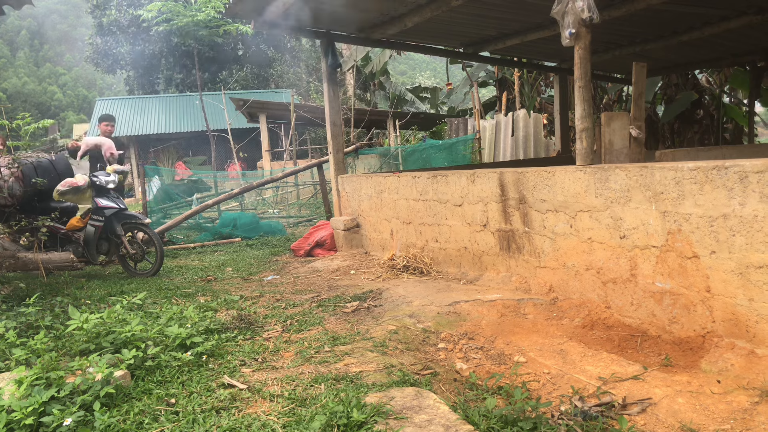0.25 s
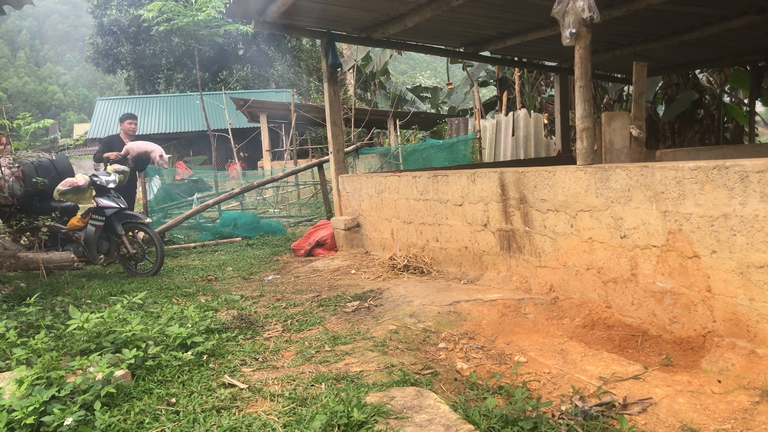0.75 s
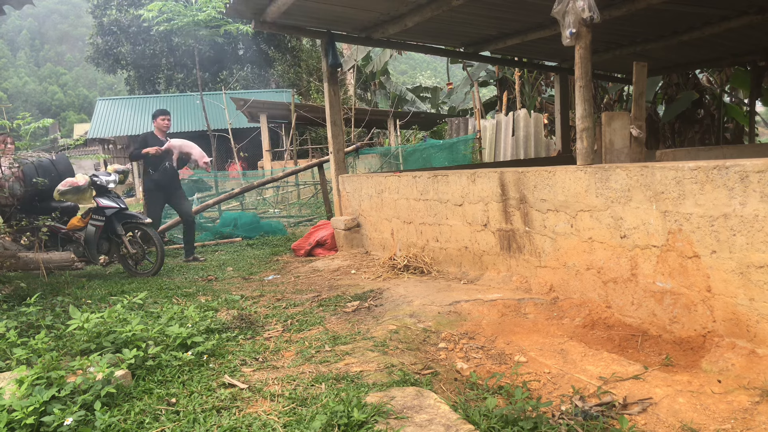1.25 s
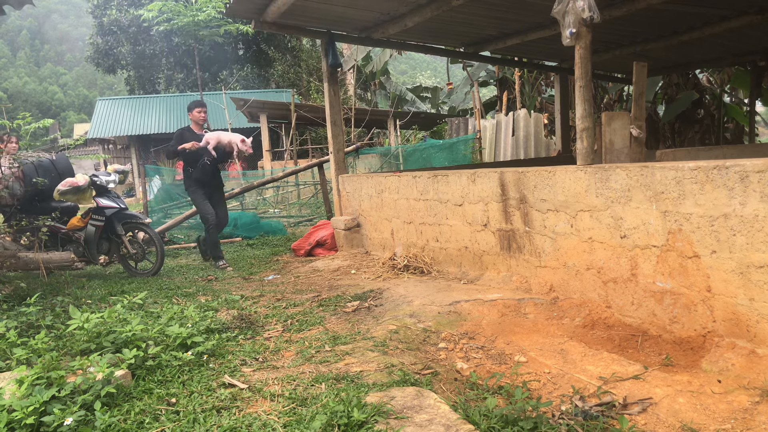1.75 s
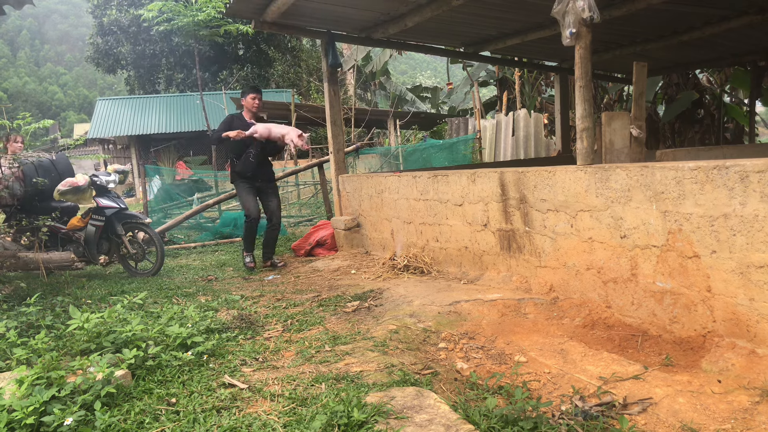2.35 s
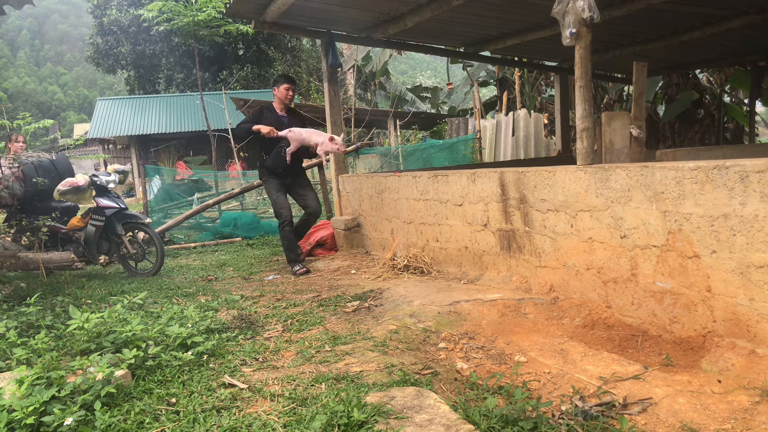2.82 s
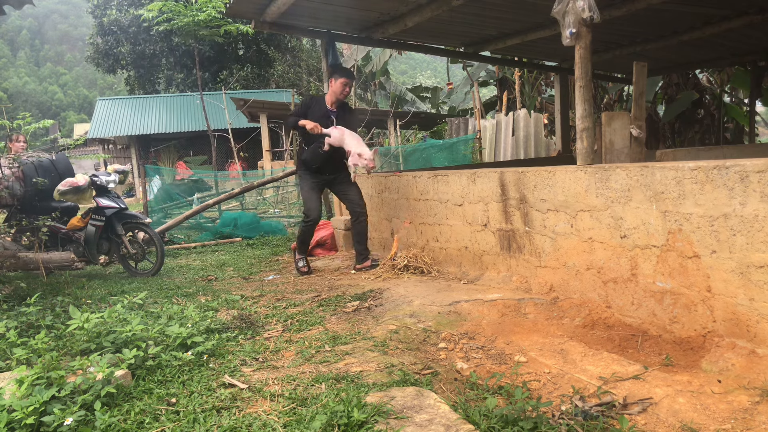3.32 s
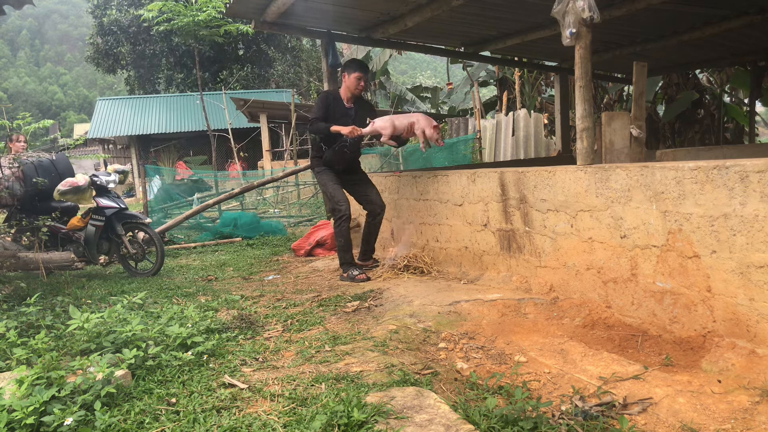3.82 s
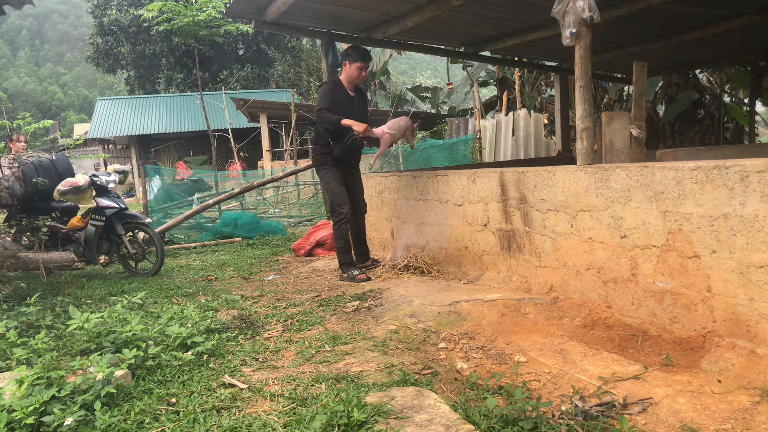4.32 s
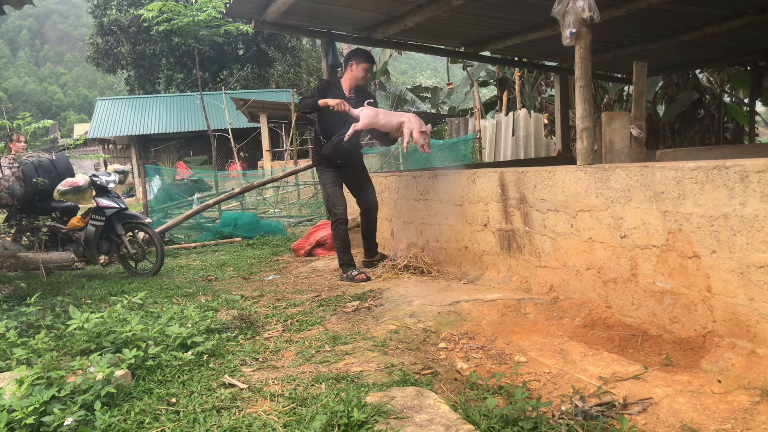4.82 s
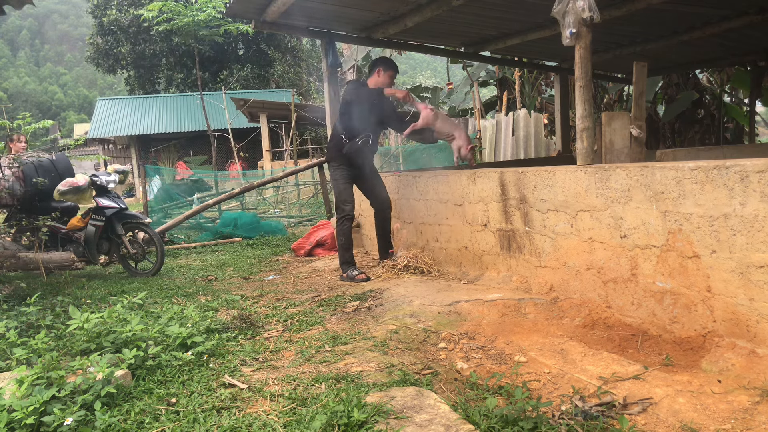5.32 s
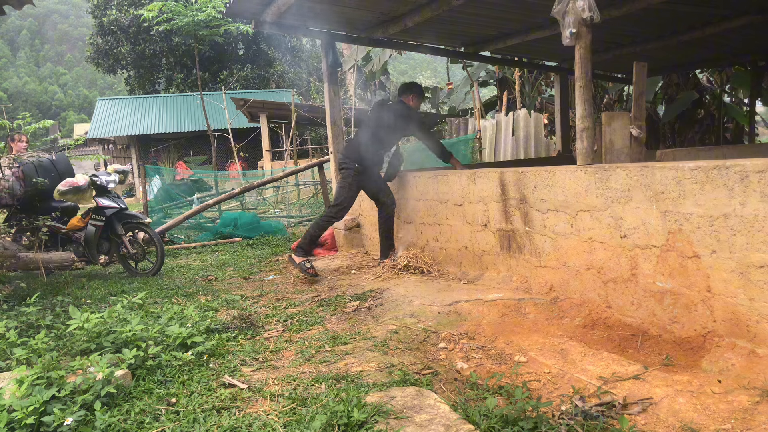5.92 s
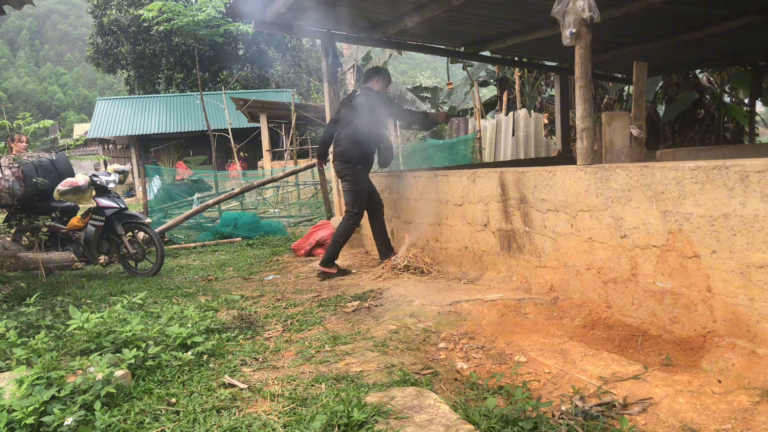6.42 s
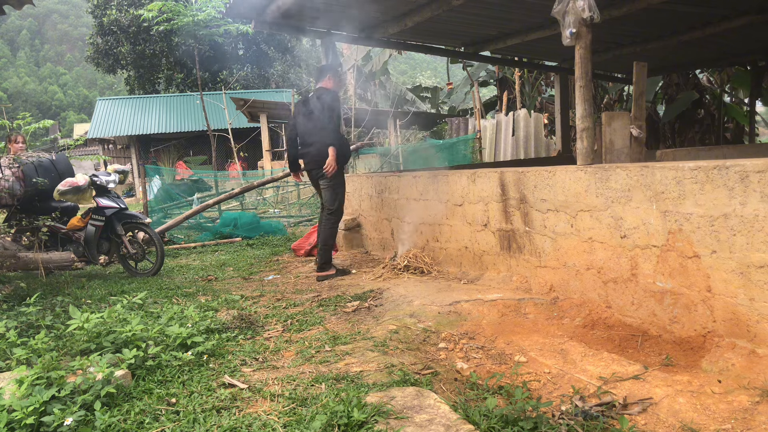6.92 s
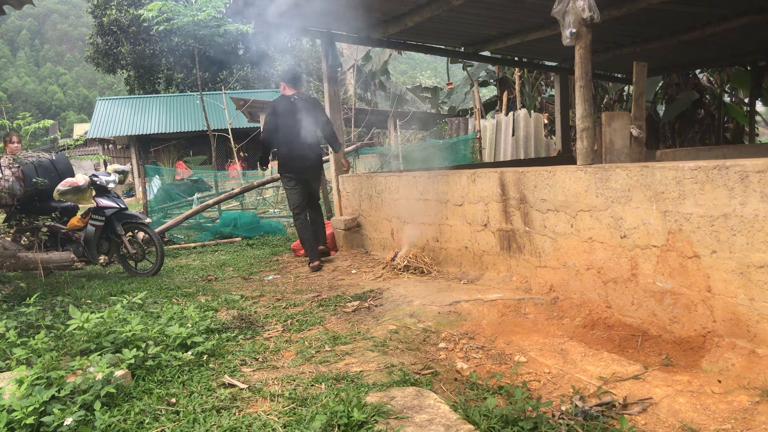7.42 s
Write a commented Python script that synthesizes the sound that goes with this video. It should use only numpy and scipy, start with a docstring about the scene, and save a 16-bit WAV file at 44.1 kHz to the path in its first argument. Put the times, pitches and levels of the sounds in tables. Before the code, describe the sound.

A piglet's very loud, shrill screaming dominates a quiet outdoor yard with faint air, a distant engine hum and occasional tiny fire snaps. It builds from low whine to short shrieks, then long whistling, rasping screams with brief gaps, some croaky yelps and one final scream. Afterwards come low grunts, gritty footsteps and cloth rubs, see-sawing bird calls and faint peeps. Centred sound from a single stationary microphone, lightly echoing.

```python
"""A piglet is carried across a farm yard, over outdoor air, a far engine's hum and a few fire snaps.
Birds call at once; the piglet whines and grumbles, then screams again and again, with hoarse yelps
before the last scream. Most screams break out of a slow rattle into a shrill whistle over rasping folds.
Then it only grunts while feet and clothes scuff, the birds return and a low drone swells.
Voices and notes are built from oscillators; air, breath and grit are shaped noise; echoes follow."""
import sys
import numpy as np
from scipy import signal
from scipy.fft import irfft, next_fast_len
from scipy.io import wavfile
from scipy.ndimage import uniform_filter1d

SR = 44100
rng = np.random.default_rng(int(sys.argv[2]) if len(sys.argv) > 2 else 0)


def to_wav(s):
    """Save 16-bit WAV."""
    ch = np.atleast_2d(s).T  # columns
    pcm = np.round(np.clip(ch, -1, 1) * 32767)  # PCM
    wavfile.write(sys.argv[1], SR, pcm.astype(np.int16))


N = 337933
TIME = np.arange(N) / SR


def gain_of(db):
    """Decibels to gain."""
    return 10 ** (np.asarray(db) / 20)


def evened(x):
    """Scales to rms 1."""
    return x / np.sqrt(np.mean(x ** 2) + 1e-20)


def steadied(x, size=900):
    """Scales to a running rms of 1, over windows of size samples."""
    running_power = uniform_filter1d(uniform_filter1d(x ** 2, size), size)
    return x / np.sqrt(abs(running_power) + 1e-14)


def read(points, hz):
    """Reads a spectrum on a log-frequency axis."""
    f, value = np.transpose(points)
    return np.interp(np.log(hz + 1), np.log(f + 1), value)


def follow(rows, t):
    """Reads every column of a curve at the times t."""
    s, *columns = np.transpose(rows)
    return [np.interp(t, s, c) for c in columns]


def span(rows):
    """Sample times covered by a curve."""
    return np.arange(rows[0][0], rows[-1][0], 1 / SR)


def add(mix, s, sound):
    """Mixes a sound in at time s."""
    part = mix[max(round(s * SR), 0):][:len(sound)]
    part += sound[:len(part)]


def faded(x, size=260):
    """Softens both ends over size samples."""
    n = np.arange(len(x))
    return x * np.minimum(np.minimum(n, n[::-1]) / size, 1)


def drift(n, hz):
    """Smooth random wander of about rms 1, with rates up to about hz."""
    f = np.fft.rfftfreq(next_fast_len(n + SR // 4), 1 / SR)
    spectrum = rng.standard_normal(len(f)) + 1j * rng.standard_normal(len(f))
    return evened(irfft(spectrum * np.exp(-(f / hz) ** 2)))[:n]


def colour(x, points):
    """Causal (minimum-phase) filter with the given spectrum."""
    log_gain = np.log(gain_of(read(points, abs(np.fft.fftfreq(4096, 1 / SR)))))
    taps = np.fft.ifft(np.exp(np.conj(signal.hilbert(log_gain)))).real[:2048]
    return signal.oaconvolve(x, taps)[:len(x)]


def note(hz, gain, waver):
    """A nearly pure tone that follows a pitch and a gain, with a slightly wavering pitch."""
    turns = np.cumsum(hz * (1 + waver * drift(len(hz), 48))) / SR
    return faded(np.sqrt(2) * gain * np.sin(2 * np.pi * turns))


def arch(length, skew):
    """Gain that rises and falls once; a skew under 1 brings the top forward."""
    return np.sin(np.pi * np.linspace(0, 1, round(length * SR)) ** skew).clip(0)


def glide(length, from_hz, to_hz, db, waver, skew=1):
    """A note that swells and fades while it eases from one pitch to another."""
    gain = np.sqrt(arch(length, 0.99))
    ease = (1 - np.cos(np.pi * np.linspace(0, 1, len(gain)) ** skew)) / 2
    return note(from_hz + (to_hz - from_hz) * ease, gain_of(db) * gain, waver)


# colour of the outdoor air: (frequency [Hz], gain [dB])
AIR = [(15, -39), (25, -24), (52, -5), (137, -7), (170, -12.5), (223, -11.5), (344, -13.5), (416, -17),
       (1070, -20), (1840, -28.5), (4250, -29), (5140, -35), (8140, -35.5), (9570, -36), (16000, -41)]
AIR_DB = -67  # before the microphone's bass thinning
# orders of the far engine: (multiple of the firing rate, level before its drift [dB])
HUM = [(2, -76.5), (3, -76), (4, -66.5), (5, -66.5), (6, -78.5)]
FIRING_HZ = 30.83
DRONE_HZ, DRONE_DB = 55, -75.5  # the drone's pitch and level until it grows
DRONE_GROWS_S, DRONE_DB_PER_S, DRONE_HZ_PER_S = 5.5, 7, 1.9  # from this time it swells and rises steadily


def background(waver=.006):
    """Outdoor air as shaped noise, the far engine's orders as sines and a drone just below the lowest one."""
    air = gain_of(AIR_DB + 1.5 * drift(N, 1.3)) * evened(colour(rng.standard_normal(N), AIR))
    air = colour(air, [(20, -14.5), (40, -7.5), (70, 0), (200, 4.5)])  # the microphone thins the deepest bass
    turns = np.cumsum(FIRING_HZ * (1 + waver * drift(N, 6.8))) / SR
    hum = np.zeros(N)
    for k, db in HUM:
        level = gain_of(db + 3.7 * drift(N, 4))
        hum += np.sqrt(2) * level * np.sin(2 * np.pi * (k * turns + rng.random()))
    grown = np.maximum(TIME - DRONE_GROWS_S, 0)
    drone_hz = DRONE_HZ + DRONE_HZ_PER_S * grown
    drone = note(drone_hz, gain_of(DRONE_DB + DRONE_DB_PER_S * grown), waver=0.046)
    return air + hum + drone


# how long the yard rings: (frequency [Hz], time to fall 60 dB [s])
YARD = [(150, 0.43), (1200, 0.59), (2800, 0.49), (6000, 0.48), (15000, 0.04)]


def yard(x, early_db=5, early_s=0.033):
    """Scattered echoes from the wall, the shed and the trees; the first ones are strongest."""
    t = np.arange(SR) / SR
    # about 2500 echoes a second with random signs, none in the first 4 ms
    taps = rng.choice([-1., 1.], SR) * (rng.random(SR) < 2500 / SR) * (t > .004)
    taps = taps * (1 + gain_of(early_db) * np.exp(-t / early_s))
    hz, at, z = signal.stft(taps, SR, nperseg=256)
    decay = gain_of(-60 * at / read(YARD, hz)[:, None])
    tail = signal.istft(z * decay, SR, nperseg=256)[1]
    return signal.oaconvolve(x, tail / np.linalg.norm(tail))[:N]


# bouts of the small bird's evenly spaced calls: (start [s], level before the stroke's own [dB])
CHIRPS = [(.005, -63.5), (5.082, -63)]
# upstroke and downstroke of one call:
# (delay after its start [s], length [s], from [Hz], to [Hz], level within the bout [dB])
CHIRP = [(0, .06, 3970, 7420, -1), (0.088, .068, 6700, 3465, -3)]
CHIRP_EVERY_S = .1843
CHIRP_EASE = 0.91  # under 1, a stroke reaches its last pitch early and lingers there
# a third bird's short falling peeps: (start [s], level [dB])
PEEPS = [(6.93, -69), (7.189, -71), (7.444, -67.5)]
PEEP_S, PEEP_FROM_HZ, PEEP_TO_HZ = .042, 2200, 1402  # every peep falls alike
# a far bird's whistled notes: (start [s], length [s], from [Hz], to [Hz], level before far_db [dB])
FAR_NOTES = [(.11, 0.16, 1304, 1306, -64), (6.856, 0.18, 1285, 1380, -63.5),
             (7.046, 0.094, 1310, 1515, -59), (7.149, 0.074, 1494, 1614, -66),
             (7.257, 0.155, 1257, 1290, -65.5)]


def birds(far_db=-1, calls=4):
    """Gliding whistles: a small bird see-saws in the trees; others whistle and peep from farther off."""
    out = np.zeros(N)
    for s, db in CHIRPS:
        for k in range(calls):
            for after, length, from_hz, to_hz, stroke_db in CHIRP:
                stroke = glide(length, from_hz, to_hz, db + stroke_db, waver=0.0071, skew=CHIRP_EASE)
                add(out, s + k * CHIRP_EVERY_S + after, stroke)
    for s, db in PEEPS:
        add(out, s, glide(PEEP_S, PEEP_FROM_HZ, PEEP_TO_HZ, db, waver=0.0044))
    for s, length, from_hz, to_hz, db in FAR_NOTES:
        add(out, s, glide(length, from_hz, to_hz, db + far_db, waver=.003))
    return out


# scuffs of feet and clothes: (start [s], length [s], level before level_db [dB])
SCUFFS = [(4.949, 0.31, -59.5), (5.18, .2, -63), (5.37, 0.5, -63), (5.978, 0.21, -67.5),
          (6.18, 0.14, -65.5), (6.373, 0.084, -60), (6.611, 0.094, -54.5), (6.74, 0.2, -61.5),
          (6.94, 0.26, -59.5), (7.13, 0.4, -69), (7.55, .11, -67.5)]


def scuffs(level_db=-3, grains_per_s=1500, skew=0.55):
    """Grit and cloth rub in small grains, swelling and fading with each move."""
    sizes = gain_of(1.4 * np.minimum(rng.exponential(1, N), 4)) * rng.standard_normal(N)
    grains = sizes * (rng.random(N) < grains_per_s / SR)
    grit = colour(grains, [(200, -31), (800, 4), (1900, 8.5), (2600, 0.5), (4000, 1), (7000, -3.5), (15000, -7)])
    pressure = np.zeros(N)
    for s, length, db in SCUFFS:
        add(pressure, s, gain_of(db + level_db) * arch(length, skew) ** 2)
    return pressure * evened(grit)


# fire snaps: (start [s], peak level [dB], brightness: gain at 10 kHz [dB])
SNAPS = [(0.067, -23.5, -14.5), (0.172, -34, 0), (3.388, -27.5, 7), (4.149, -32.5, -6), (5.118, -45, -10),
         (5.128, -43, -17), (5.215, -39.5, -12.5), (5.404, -30.5, -7), (6.078, -47, -1), (6.524, -36.5, -3),
         (7.085, -44.5, -19.5)]


def fire(decay_s=0.0015, second_db=-24, second_decay_s=0.0014):
    """Burning twigs burst with a very short crack."""
    out, t = np.zeros(N), np.arange(1500) / SR
    for s, db, bright_db in SNAPS:
        envelope = np.exp(-t / decay_s) + gain_of(second_db) * np.exp(-t / second_decay_s)
        burst = rng.standard_normal(len(t)) * envelope
        crack = colour(burst, [(200, -13.0), (1300, -1.5), (3500, -1.5), (6000, -3.5),
                               (10000, bright_db), (16000, bright_db - 1.5)])
        add(out, s, gain_of(db) * crack / abs(crack).max())
    return out


def vocal_folds(fold_hz, rough):
    """Strong and weak beats alternate, putting half lines between the harmonics; each line swells and strays."""
    n = len(fold_hz)
    turns = np.cumsum(fold_hz) / SR
    lines = np.zeros(n)
    for k in range(2, 58):  # even k are harmonics, odd k the half lines
        stray_hz = min(9 * k, 85) * (.5 + rough) * drift(n, 32)
        size = np.where(k % 2, .8 * rough, 1) * gain_of(5 * drift(n, 38))
        stray_turns = np.cumsum(stray_hz) / SR + rng.random()
        lines += size * np.cos(np.pi * k * turns + 2 * np.pi * stray_turns)
    puffs = (1 + .7 * np.cos(2 * np.pi * turns)) * rng.standard_normal(n)
    return evened(lines) + (.3 + .7 * rough ** 2) * evened(puffs)


# throat resonances at full scream: (centre [Hz], width [Hz], gain before the bands are levelled [dB])
THROAT = [(560, 110, -9), (1317, 200, 10), (1530, 420, 1), (2720, 650, 13.5), (3220, 290, 18),
          (4260, 1200, 12), (5590, 1680, 11), (8210, 1100, 14.5), (10630, 2500, 1.5), (14020, 6900, 2)]
FULL_SCREAM_HZ = 2680
# overtones of the whistle: (multiple, level against the fundamental before its drift [dB])
OVERTONES = [(1, 0), (2, -21), (3, -21), (4, -31), (5, -33)]
DROOP_S = .011  # the whistle leaps up to its pitch, and droops in this time as the air runs out
# the mouth's ring follows the rasp (slope in dB per dB) and flares in the leap; the hiss on top follows too
MOUTH_DB, MOUTH_SLOPE, MOUTH_LEAP_DB = -26, 0.64, 18
HISS_DB, HISS_SLOPE = -11.5, 0.85
SCREAM_ATTACK_S, SCREAM_RELEASE_S = 0.016, .014


def scream(rows, voice, ratio, whistle_db=-1.0, quaver_db=0.66):
    """A whistle and its overtones, with the folds beating near a whole fraction of its pitch."""
    t = span(rows)
    n = len(t)
    hz, tone_level, rasp_level = follow(rows, t)
    least_rough, mouth_db, hiss_db, leap_share, leap_s, droop_share = voice
    leap, droop = np.exp((t[0] - t) / leap_s), np.exp((t - t[-1]) / DROOP_S)
    hz = uniform_filter1d(hz, size=500) * (1 - leap_share * leap - droop_share * droop)
    mouth_level = MOUTH_DB + mouth_db + MOUTH_SLOPE * rasp_level + MOUTH_LEAP_DB * leap
    hiss_level = HISS_DB + hiss_db + HISS_SLOPE * rasp_level

    # the voice is cleanest where the whistle stands far above the rest
    clear_db = tone_level - np.maximum(rasp_level, mouth_level)
    rough = np.clip(.8 - clear_db / 14, least_rough, 1)
    hz = hz * (1 + rough * (.016 * drift(n, 35) + .01 * drift(n, 350)))
    turns = np.cumsum(hz) / SR
    tone = np.zeros(n)
    for k, db in OVERTONES:
        tone += gain_of(db + 3 * (k > 1) * drift(n, 25)) * np.sin(2 * np.pi * k * turns)
    tone *= 1 + .08 * np.cos(2 * np.pi * turns / ratio) + .35 * rough * drift(n, 110)
    tone *= gain_of(quaver_db * drift(n, 22))
    drive = vocal_folds(hz / ratio * (1 + .025 * rough * drift(n, 14)), rough)

    # the throat's resonances rise with the pitch as the mouth is pulled open; the lowest move least
    f, at, z = signal.stft(drive, SR, nperseg=512, noverlap=384)
    opening = np.interp(at, t - t[0], hz) / FULL_SCREAM_HZ
    f = f[:, None]
    power = 0
    for centre, width, db in THROAT:
        moved = centre * opening ** (.35 if centre < 2000 else .75)
        power = power + gain_of(db) ** 2 / (1 + (2 * (f - moved) / width) ** 2) ** 2
    z = z * np.sqrt(power)

    def band_sound(band):
        """One band of the throat's sound, held at a steady level."""
        return steadied(signal.istft(z * band, SR, nperseg=512, noverlap=384)[1][:n])

    low, high = 1 / (1 + (f / 2100) ** 12), 1 / (1 + (7000 / (f + 1)) ** 12)
    mouth, rasp, hiss = band_sound(low), band_sound(1 - low - high), band_sound(high)
    harsh = gain_of(mouth_level) * mouth + gain_of(rasp_level) * rasp + gain_of(hiss_level) * hiss
    flutter = gain_of(2.4 * rough * drift(n, 90))
    attack = np.minimum((t - t[0]) / SCREAM_ATTACK_S, 1)
    release = np.minimum((t[-1] - t) / SCREAM_RELEASE_S, 1)
    whistle = np.sqrt(2) * gain_of(tone_level + whistle_db) * tone
    return t[0], attack * release * faded(whistle + harsh * flutter)


# colour of the chest, scaled in frequency by each growl's throat tuning: (frequency [Hz], gain [dB])
CHEST_COLOUR = [(90, -21.5), (150, 16), (195, -0.5), (300, -6.5), (470, 2), (620, -8.5), (800, -14),
                (1500, -37.5), (5000, -71)]
GROWL_FROM_DB = -16  # every growl swells from this far down


def growl(row, mouth_colour, jitter, leak, mouth_db, chest_db, sag_db, bend=0):
    """Slack folds flap slowly; each flap knocks the mouth and the chest and lets out a puff."""
    start, length, rise, mouth_level, chest_level, throat, beat_hz = row
    n = round(length * SR)
    t = np.arange(n) / SR
    effort = gain_of(np.interp(t, [0, min(rise, length), length], [GROWL_FROM_DB, 0, sag_db]))
    flap_hz = beat_hz * (1 + bend * np.linspace(-.5, .5, n) + jitter * drift(n, 50))
    turns = np.cumsum(flap_hz) / SR + .5
    flaps = np.diff(np.floor(turns), prepend=0) * gain_of(2 * drift(n, 58.4))
    flaps = colour(flaps, [(1500, -9), (5000, -15.0)])  # soft tissue blunts the knock
    puffs = (0.149 + np.exp(-(turns % 1) / 0.42)) * rng.standard_normal(n)
    drive = steadied(evened(flaps) + leak * evened(puffs), size=1500)
    mouth = steadied(colour(drive, np.multiply(mouth_colour, [throat, 1])), size=1200)
    chest = steadied(colour(drive, np.multiply(CHEST_COLOUR, [throat, 1])), size=1200)
    voice = gain_of(mouth_level + mouth_db) * mouth + gain_of(chest_level + chest_db) * chest
    return start, faded(effort * voice, size=120)


# the low whine before and into the first scream: (time [s], pitch before waver [Hz], level before whine_db [dB])
WHINE = [(0.17, 436, -63.5), (0.582, 468.5, -57), (0.608, 380, -61), (0.64, 390, -56), (0.682, 545.6, -48),
         (0.758, 453.6, -49.5), (0.86, 534, -62)]
# one curve a scream, four short and four long:
# (time [s], whistle pitch before leap, droop and wander [Hz], whistle level before trim [dB], rasp level [dB])
SCREAMS = [
    [(0.665, 2736, -62, -64.5), (0.749, 2768, -49.5, -53), (0.769, 2670, -66, -55.5),
     (0.847, 2563, -60, -57), (0.921, 2767, -43, -42.5), (0.98, 2676, -48.5, -60)],
    [(1.146, 2320, -50, -55), (1.164, 2340, -39, -48), (1.174, 2440, -35.5, -46),
     (1.254, 2560, -48.5, -66.5), (1.26, 2510, -49, -65)],
    [(1.425, 2380, -51, -43), (1.461, 2400, -37, -45), (1.499, 2417, -45, -47), (1.535, 2510, -33.5, -52.5),
     (1.595, 2529, -42, -48.5), (1.63, 2350, -39, -39.5)],
    [(3.225, 2496, -31.5, -37.5), (3.239, 2507, -33.5, -35), (3.259, 2557, -27, -30),
     (3.273, 2696, -37.5, -33.5), (3.293, 2760, -29.5, -28.5), (3.325, 2775, -39, -43)],
    [(1.612, 2415, -44, -43), (1.654, 2530, -31.5, -34.5), (1.686, 2563, -19, -35),
     (1.698, 2586, -33.5, -36.5), (1.748, 2586, -25.5, -41), (1.76, 2535, -34, -39),
     (1.822, 2736, -25, -35.5), (1.912, 2745, -39.5, -42), (1.992, 2856, -34.5, -32),
     (2.034, 2950, -18.5, -28.5), (2.096, 2890, -36, -39.5), (2.112, 2751, -28.5, -34.5),
     (2.216, 2736, -34.5, -37.5), (2.272, 2744, -29.5, -30.5), (2.32, 2770, -39.5, -46)],
    [(2.527, 2484, -49.5, -46), (2.543, 2444, -44, -42.5), (2.621, 2640, -32, -39),
     (2.673, 2626, -40, -37.5), (2.773, 2618, -31.5, -36), (2.811, 2757, -32.5, -30),
     (2.827, 2717, -19, -29.5), (2.879, 2810, -30.5, -36), (2.981, 2757, -26.5, -32),
     (3.001, 2790, -32, -37), (3.129, 2682, -37, -36.5), (3.141, 2715, -29, -34), (3.201, 2686, -35, -36),
     (3.221, 2733, -33.5, -40.5), (3.24, 2790, -30, -29)],
    [(3.51, 2534, -34.5, -35.5), (3.53, 2605, -22.5, -29.5), (3.552, 2672, -24, -25.5),
     (3.602, 2770, -34.5, -34), (3.654, 2823, -16, -36.5), (3.666, 2835, -29.5, -34),
     (3.684, 2823, -22.5, -30), (3.692, 2840, -32.5, -33), (3.742, 2763, -31.5, -31.5),
     (3.774, 2824, -18, -31), (3.812, 2820, -32, -33), (3.85, 2810, -26, -40), (3.886, 2793, -32, -36),
     (3.944, 2780, -28.5, -37.5), (3.965, 2733, -33.5, -40.5)],
    [(4.575, 2437, -46.5, -48), (4.599, 2497, -39.5, -41), (4.609, 2588, -37, -35),
     (4.677, 2758, -26.5, -38.5), (4.705, 2792, -32, -36), (4.717, 2698, -23.5, -38),
     (4.757, 2800, -32.5, -32.5), (4.767, 2741, -18.5, -38.5), (4.805, 2775, -19.5, -32.5),
     (4.811, 2812, -23.5, -35), (4.851, 2786, -17.5, -34.5), (4.879, 2778, -24, -33),
     (4.911, 2702, -38.5, -41.5), (4.925, 2714, -29, -44)],
]
# the voice in each scream: (least roughness [0-1], mouth trim [dB], hiss trim [dB],
# leap [share of pitch], leap time [s], droop [share of pitch])
VOICES = [(.3, -1.5, 1.5, .22, .03, .02), (0.4, 2, 2, 0.61, 0.016, 0.034), (0.43, 4, -1, 0.39, .015, .08),
          (0.8, 1.5, 0, .1, 0.025, 0.17), (.33, -0.5, 0, .25, .022, 0.16),
          (.33, 0.5, 1.5, .45, 0.02, 0.082), (.3, -2, 1, .42, .011, .25), (.45, 0, 5, .28, .035, 0.5)]
# for each scream: (whistle cycles to one beat of the folds)
FOLD_RATIO = [5, 5, 5, 5, 5, 5, 5, 4]
# growls, as rattles that lead into screams, hoarse yelps and low grunts: (start [s], length [s], rise [s],
# mouth level before trim [dB], chest level before trim [dB], throat tuning [ratio], mean flap rate [Hz])
RATTLES = [(0.666, 0.012, .006, -50, -58, 1.07, 88.4), (1.106, .058, .048, -37, -57, 1.136, 72),
           (1.381, .06, 0.023, -36, -51.5, 1.14, 87.6), (2.431, .112, .024, -37, -50.5, .94, 82.1),
           (3.455, .069, .028, -25, -57.5, 1.09, 97.3)]
YELPS = [(4.261, .095, 0.011, -38.5, -59.5, 0.93, 373.3), (4.353, 0.099, 0.042, -34.5, -61, 1.033, 382),
         (4.482, .11, .048, -34.5, -62.5, 1.08, 423)]
GRUNTS = [(0.287, 0.21, 0.051, -90, -61, 1.58, 80.6), (.52, 0.39, 0.11, -60, -52, 0.8, 78.6),
          (4.152, 0.065, 0.025, -36.5, -53, 1.13, 73.7), (4.191, 0.076, 0.044, -38.5, -43.5, 1.06, 78),
          (5.21, 0.22, 0.041, -53, -49, 0.97, 79.6), (5.609, .2, 0.097, -59.5, -51, 1.0, 80),
          (5.95, 0.22, 0.046, -60, -51, 1.01, 78.8)]
# mouth colours, scaled in frequency by the throat tuning: (frequency [Hz], gain [dB])
RATTLE_COLOUR = [(550, -35.5), (850, -23.5), (1170, 5.5), (1600, -10), (1950, -17.5), (2300, -6),
                 (3400, -21), (4500, -15), (6500, -32.5), (9000, -33.5), (16000, -36)]
YELP_COLOUR = [(700, -31.5), (1180, -1), (1550, -2.5), (2000, 1.5), (2600, -13), (3300, -12), (4200, -2),
               (5200, -14.5), (6500, -11.5), (7900, -4.5), (9200, -18.5), (16000, -23)]
GRUNT_COLOUR = [(600, -20.5), (850, 2.5), (1150, 4.5), (1450, 2), (1900, -0.5), (2400, -12.5),
                (4000, -18.5), (8000, -25), (16000, -35)]
YELP_FROM_HZ, YELP_TO_HZ = 1800, 2214  # a thin whistle slides up through each yelp, at throat tuning 1


def piglet(whine_db=-4, yelp_whistle_db=-3):
    """One throat, from pure whine and whistling screams to the slow flaps of rattles, yelps and grunts."""
    out = np.zeros(N)
    hz, db = follow(WHINE, span(WHINE))
    add(out, WHINE[0][0], note(hz, gain_of(db + whine_db), waver=0.054))
    for rows, voice, ratio in zip(SCREAMS, VOICES, FOLD_RATIO):
        add(out, *scream(rows, voice, ratio))
    for row in RATTLES:
        add(out, *growl(row, RATTLE_COLOUR, jitter=.05, leak=1.0, mouth_db=-0.5, chest_db=1.0, sag_db=-2))
    for row in YELPS:
        add(out, *growl(row, YELP_COLOUR, jitter=.05, leak=0.61,
                        mouth_db=0.5, chest_db=-6.5, sag_db=-10, bend=.22))
        start, length, _, db, _, throat, _ = row
        whistle = glide(length, YELP_FROM_HZ * throat, YELP_TO_HZ * throat, db + yelp_whistle_db, waver=0.032)
        add(out, start, whistle * arch(length, 0.69) ** 2)
    for row in GRUNTS:
        add(out, *growl(row, GRUNT_COLOUR, jitter=0.38, leak=3.53, mouth_db=-1.5, chest_db=0, sag_db=-11.5))
    return out


def scene(pig_wet_db=-9, bird_wet_db=-6, snap_wet_db=-15):
    """Everything reaches one microphone, heard alike in both ears."""
    pig, song, snaps = piglet(), birds(), fire()
    echoes = yard(gain_of(pig_wet_db) * pig + gain_of(bird_wet_db) * song + gain_of(snap_wet_db) * snaps)
    mono = pig + song + snaps + echoes + scuffs() + background()
    return np.array([mono, mono])


EDGE_HZ = 16100


def record(dry):
    """The recorder's band limit: a steep low-pass at EDGE_HZ."""
    taps = signal.firwin(511, EDGE_HZ, window=("kaiser", 9), fs=SR)
    return signal.oaconvolve(dry, taps[None], "same")


dry = scene()
out = record(dry)
to_wav(out)
```